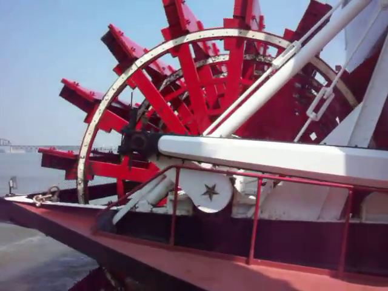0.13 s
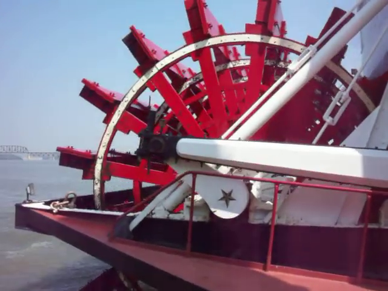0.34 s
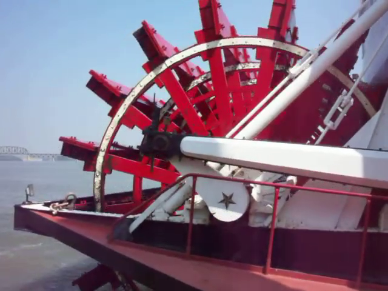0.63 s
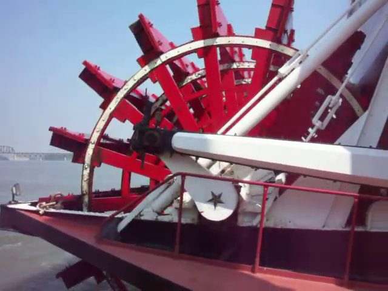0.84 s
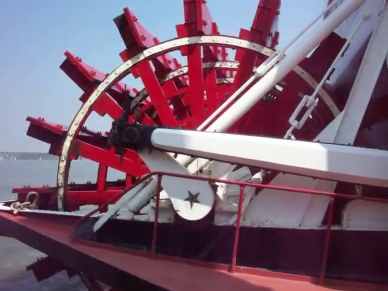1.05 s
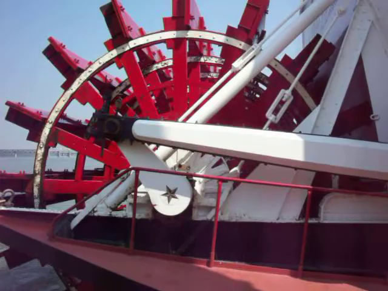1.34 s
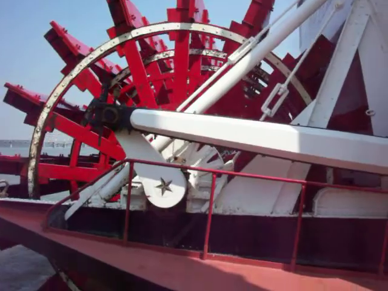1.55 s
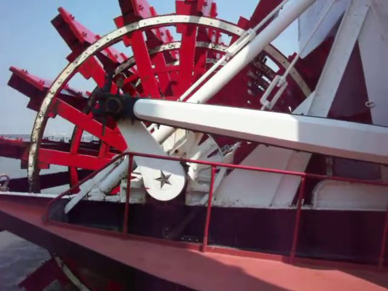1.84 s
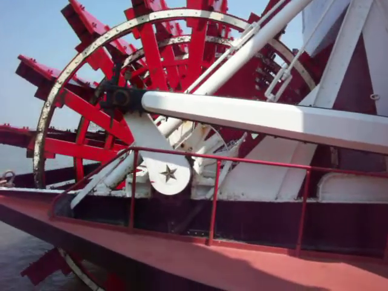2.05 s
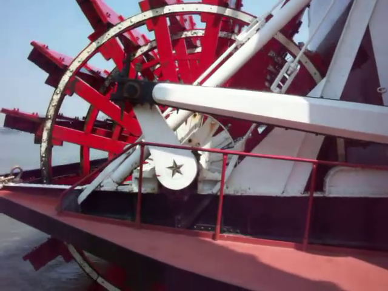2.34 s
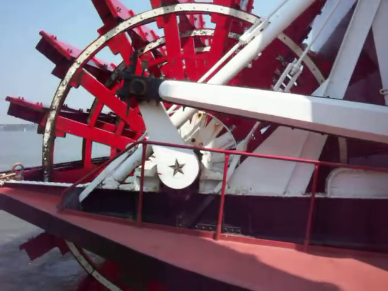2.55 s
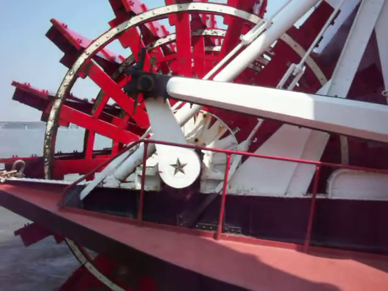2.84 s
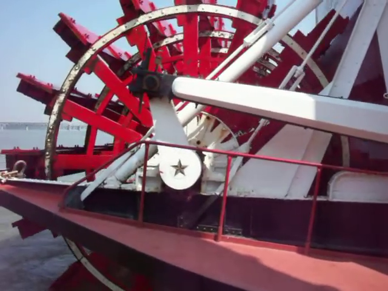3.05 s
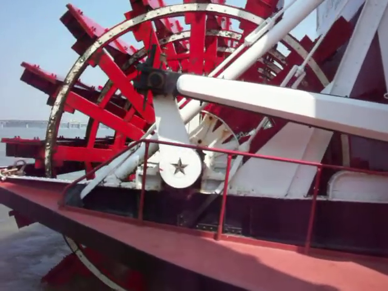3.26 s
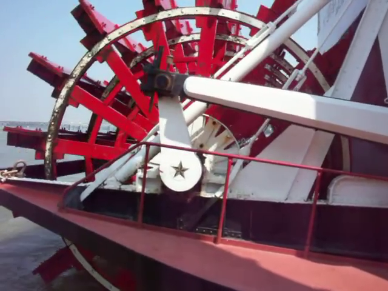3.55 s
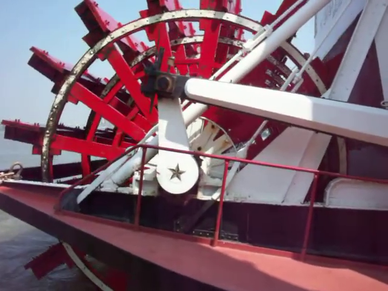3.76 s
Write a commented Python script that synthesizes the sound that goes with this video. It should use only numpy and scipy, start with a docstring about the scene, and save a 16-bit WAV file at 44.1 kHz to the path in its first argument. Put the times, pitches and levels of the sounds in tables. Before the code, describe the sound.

A paddlewheel churns water in a dense, splashing rush, with machinery humming underneath.

```python
"""On the deck of a river boat, beside its slowly turning stern wheel.
Water pours off the paddles as a dense rush of hiss, droplet impacts and ringing bubbles, over the
churn and rumble of the wake; the paddles reflect its treble. Narrow bands ring out briefly, and there
is one faint tick. The machinery hums unsteadily and gives one rising groan as the crank comes round."""
import sys
import numpy as np
from scipy import signal
from scipy.fft import rfft, irfft
from scipy.io import wavfile

SR = 44100
rng = np.random.default_rng(int(sys.argv[2]) if len(sys.argv) > 2 else 0)


def generate_wav(signal):
    """Clip the signal to [-1, 1] and save it as 16-bit WAV at the path in sys.argv[1]."""
    frames = np.transpose(np.atleast_2d(signal))
    scaled = np.clip(frames, -1, 1) * 32767
    pcm = np.round(scaled).astype(np.int16)
    wavfile.write(sys.argv[1], SR, pcm)


N = 172872


def from_db(db):
    """Decibels to gain."""
    return 10 ** (np.asarray(db) / 20)


def unit_rms(x):
    """Scale to an rms of one."""
    return x / np.sqrt(np.mean(x ** 2) + 1e-20)


def per_sample(rows):
    """Interpolate each column after the time column; end values hold."""
    times_s, *columns = np.transpose(rows)
    return [np.interp(np.arange(N) / SR, times_s, column) for column in columns]


def drift(rate_hz):
    """Smooth random wander, unit rms."""
    hop, settle = 40, 2000
    pole = np.exp(-2 * np.pi * hop * rate_hz / SR)
    noise = rng.standard_normal(N // hop + settle + 2)
    slow = signal.lfilter([1], [1, -2 * pole, pole * pole], noise)[settle:]
    return np.interp(np.arange(N) / hop, np.arange(len(slow)), unit_rms(slow))


def wavering_tone(hz, width_hz):
    """A tone whose amplitude and phase wander, filling a narrow band."""
    phase = 2 * np.pi * np.cumsum(np.full(N, hz)) / SR
    return unit_rms(drift(width_hz) * np.cos(phase) + drift(width_hz) * np.sin(phase))


def impacts(per_s, spread_db):
    """Random clicks, many small and a few large."""
    sizes = from_db(spread_db * np.minimum(rng.exponential(1, N), 4))
    signs = rng.choice([-1, 1], N)
    return unit_rms(sizes * signs * (rng.random(N) < per_s / SR))


# Water spectrum. Each row: frequency in Hz, relative level in dB.
WATER_SPECTRUM = [(15, -13.6), (25, -13), (45, -0.5), (90, -2.6), (120, -3.5), (220, -2), (340, -2.5),
                  (460, -6.5), (600, -2), (780, -4.5), (1050, -6), (1480, -4), (1700, -0.1), (2050, -0.87),
                  (2400, -1), (2750, -2), (3000, 0.5), (3800, 0), (4500, -2), (5030, -1.5), (5350, -6.5),
                  (5700, -14.5), (6000, -25), (6300, -47.5)]
# Flow curves, low band to high. Each row: time in seconds, level in dB (used about the curve's mean).
WAKE_RUMBLE = [(0.0, -37), (0.24, -35.5), (0.84, -42), (1.12, -32.5), (1.36, -36.5), (1.76, -36.5),
               (1.88, -36), (2.16, -36), (3.84, -34.5), (3.91, -28.5)]
WAKE_CHURN = [(0.0, -22), (0.08, -23.1), (0.401, -25.5), (0.479, -24.5), (0.841, -24.5), (1.081, -22),
              (1.319, -23.5), (1.439, -22), (1.958, -25), (2.04, -23.5), (2.239, -25), (2.599, -22.5),
              (3.038, -24), (3.161, -22.0), (3.599, -23), (3.91, -22)]
SPLASH_LEVEL = [(0, -19), (.5, -19.5), (1.2, -20), (2.0, -21), (2.3, -18.5), (2.95, -18.5), (3.5, -19.5),
                (3.92, -19)]
SPRAY_LEVEL = [(0.0, -18.5), (0.2, -18.5), (0.521, -20), (1.321, -17), (1.68, -17.5), (1.76, -17.5),
               (2.401, -17.5), (2.959, -19.5), (3.72, -17), (3.8, -20.5), (3.91, -17)]
HISS_LEVEL = [(0.0, -21), (0.241, -19), (0.44, -21), (0.762, -19.5), (1.162, -22.5), (1.402, -20),
              (1.519, -22), (1.761, -18), (1.88, -21), (2.079, -21), (2.281, -21.5), (2.6, -19),
              (2.76, -22), (3.082, -21.5), (3.279, -22), (3.56, -20.5), (3.678, -20.5), (3.91, -19)]
# Zone centres in Hz: rumble, churn (two), splash, spray, hiss.
ZONE_CENTRES_HZ = [70, 350, 1250, 2000, 3500, 4900]


def water_rush(level_db=-17, drop_share=0.39, swell_db=0.5, flutter_db=0.83):
    """Hiss and droplet impacts, in bands that follow the flow, swell singly and flutter together."""
    hiss = np.sqrt(1 - drop_share) * rng.standard_normal(N)
    drops = np.sqrt(drop_share) * impacts(per_s=2500, spread_db=2.5)
    hz = np.maximum(np.arange(N // 2 + 1) * SR / N, 1)
    points_hz, points_db = np.transpose(WATER_SPECTRUM)
    colour = from_db(np.interp(np.log(hz), np.log(points_hz), points_db))
    water = unit_rms(irfft(rfft(hiss + drops) * colour, N))
    spectrum = rfft(water)
    curves = (WAKE_RUMBLE, WAKE_CHURN, WAKE_CHURN, SPLASH_LEVEL, SPRAY_LEVEL, HISS_LEVEL)
    flow_db = np.array([per_sample(curve)[0] for curve in curves])
    flow_db -= flow_db.mean(axis=1, keepdims=True)
    centres_hz = np.linspace(np.sqrt(50), np.sqrt(6000), 28) ** 2
    out = 0
    for centre_hz, selector in zip(centres_hz, np.eye(len(centres_hz))):
        weights = np.array([np.interp(centre_hz, ZONE_CENTRES_HZ, zone) for zone in np.eye(len(curves))])
        band = irfft(spectrum * np.interp(hz, centres_hz, selector), N)
        out += band * from_db(weights @ flow_db + swell_db * drift(rate_hz=1.3))
    return out * from_db(level_db + flutter_db * drift(rate_hz=59))


def bubbles(level_db=-31, ring_cycles=38, pitches=30):
    """Small bubbles ring at scattered pitches, each falling 60 dB over ring_cycles."""
    clicks = impacts(per_s=270, spread_db=6.5)
    pitch_index = rng.integers(0, pitches, N)
    out = 0
    for k, hz in enumerate(np.geomspace(1600, 5000, pitches)):
        radius = np.exp(-np.log(1000) * hz / (ring_cycles * SR))
        angle = 2 * np.pi * hz / SR
        kicks = clicks * (pitch_index == k) + 1e-18
        out += signal.lfilter([0, np.sin(angle)], [1, -2 * radius * np.cos(angle), radius ** 2], kicks)
    return from_db(level_db) * unit_rms(out)


def paddle_echoes(water, paddles=14, echo_db=-20.5, sway_s=0.00011, highpass_hz=920):
    """Each turning paddle reflects the treble over a slowly changing path; longer waves bend round it."""
    n = np.arange(N)
    treble = signal.sosfilt(signal.butter(2, highpass_hz, "high", fs=SR, output="sos"), water)
    out = 0
    for delay_s in rng.uniform(0.008, 0.06, paddles):
        lag = (delay_s + sway_s * drift(rate_hz=0.58)) * SR
        out += from_db(echo_db) * np.interp((n - lag) % N, n, treble)
    return out


# Hums. Each row: frequency in Hz, width in Hz, starting level in dB, final level in dB.
MACHINERY_HUMS = [(68.6, 4.4, -48.5, -36.5), (159, 5, -41, -43.5), (286.4, 11, -38, -47),
                  (598, 54, -52.5, -35.5)]


def machinery_hums():
    """Machinery and hull hum unsteadily, each tone growing or fading."""
    return sum(from_db(np.linspace(start_db, end_db, N)) * wavering_tone(hz, width_hz)
               for hz, width_hz, start_db, end_db in MACHINERY_HUMS)


# Swells. Each row: centre in seconds, length in seconds, pitch in Hz, full width in Hz, level in dB.
RINGING_SWELLS = [(0.403, 0.9, 2995, 200, -29.5), (0.535, 0.17, 1852, 90, -27.5),
                  (0.698, 0.39, 4920, 220, -35), (.86, .4, 2090, 50, -30), (1.005, .4, 162, 7, -31),
                  (1.67, .12, 1684, 90, -27), (1.848, 0.32, 1772, 50, -31.5), (1.8, .5, 160, 7, -37),
                  (2.6, 0.45, 5540, 400, -37), (2.85, .3, 1768, 74, -29.5), (2.85, 0.2, 612, 42, -32),
                  (2.953, 0.13, 2094, 190, -27), (3.4, .16, 1656, 14, -30), (3.67, .12, 3250, 70, -29)]


def ringing_swells():
    """Narrow bands swell out of the rush and sink back."""
    t = np.arange(N) / SR
    out = 0
    for centre_s, length_s, hz, full_width_hz, db in RINGING_SWELLS:
        envelope = np.exp(-2 * ((t - centre_s) / length_s) ** 2)
        out += from_db(db) * envelope * wavering_tone(hz, full_width_hz / 2)
    return out


# Groan. Each row: time in seconds, pitch in Hz, level in dB.
CRANK_GROAN = [(.7, 238, -44), (1.1, 254, -34), (1.4, 264, -34.5), (1.57, 277, -32), (1.72, 284, -34),
               (2.03, 294, -37.5), (2.35, 303, -48)]


def crank_groan(jitter_hz=8, shake_db=2, shake_rate_hz=18):
    """One shaky tone swells, rises and fades as the crank comes round."""
    pitch_hz, level_db = per_sample(CRANK_GROAN)
    phase = 2 * np.pi * np.cumsum(pitch_hz + jitter_hz * drift(shake_rate_hz)) / SR
    shake = from_db(shake_db * drift(shake_rate_hz))
    return from_db(level_db) * unit_rms(np.sin(phase) * shake)


def tick(start_s=1.098, level_db=-12, decay_samples=10):
    """One faint, sharp tick that dies within a millisecond."""
    age = np.arange(N) - int(start_s * SR)
    return from_db(level_db) * (age >= 0) * np.exp(-np.abs(age) / decay_samples)


def scene():
    """Water, paddle echoes and machinery, in mono."""
    water = water_rush() + bubbles()
    mix = water + paddle_echoes(water) + machinery_hums() + crank_groan() + ringing_swells()
    return mix[None]


def record(dry):
    """Soft clipping, then a steep treble cut; only the tick reaches higher."""
    ceiling, stop_hz, tick_stop_hz = 0.87, 6650, 16500
    rounded = ceiling * np.tanh(dry / ceiling)
    narrow = signal.sosfilt(signal.cheby2(18, 60, stop_hz, fs=SR, output="sos"), rounded)
    return signal.sosfilt(signal.cheby2(18, 70, tick_stop_hz, fs=SR, output="sos"), narrow + tick())


dry = scene()
out = record(dry)
generate_wav(out)
```